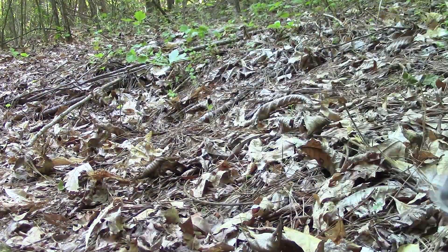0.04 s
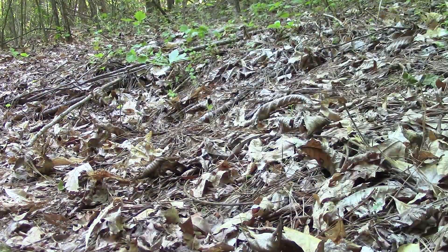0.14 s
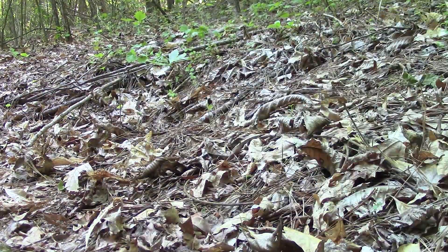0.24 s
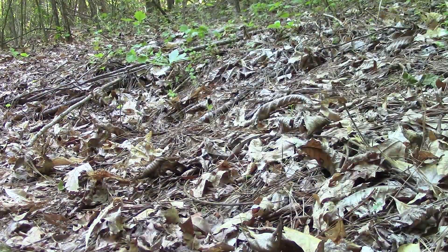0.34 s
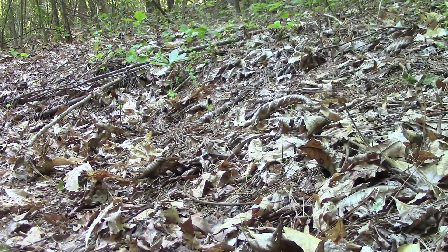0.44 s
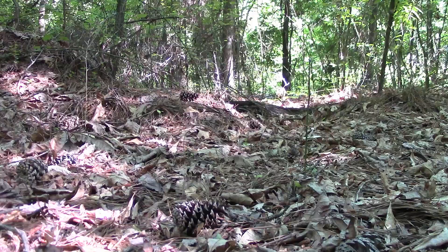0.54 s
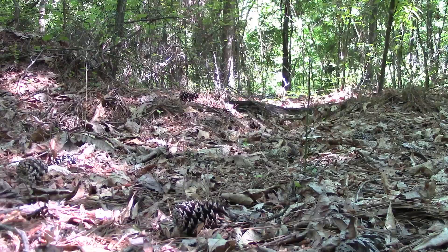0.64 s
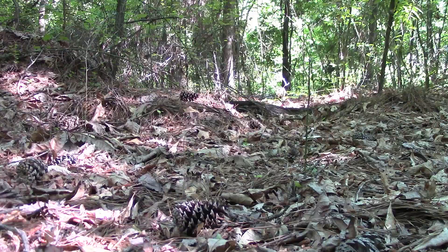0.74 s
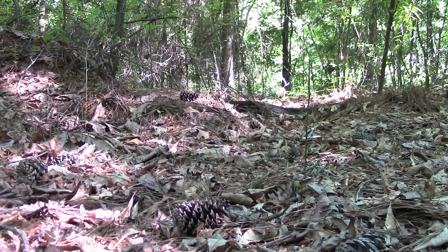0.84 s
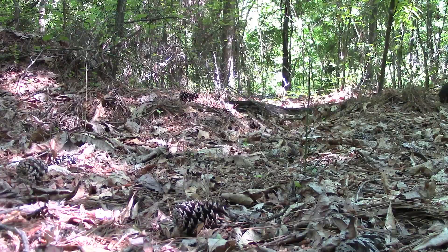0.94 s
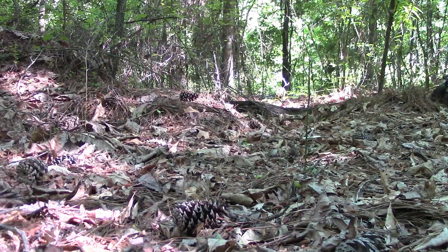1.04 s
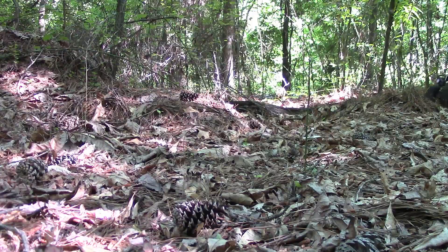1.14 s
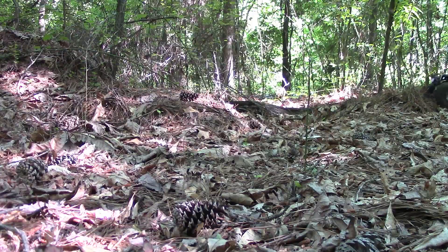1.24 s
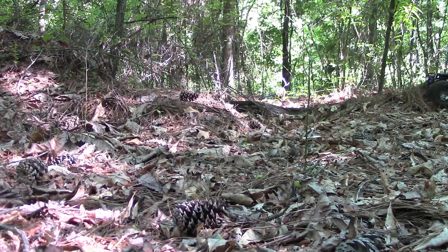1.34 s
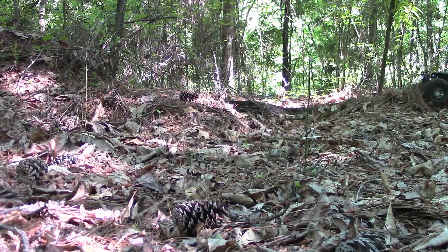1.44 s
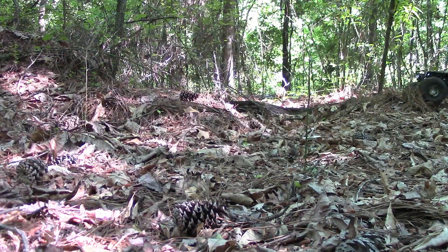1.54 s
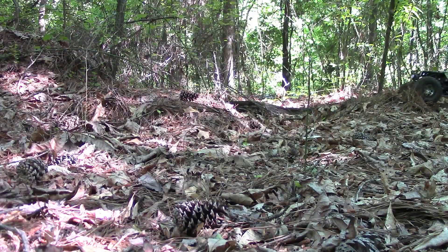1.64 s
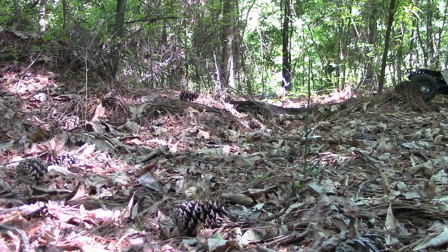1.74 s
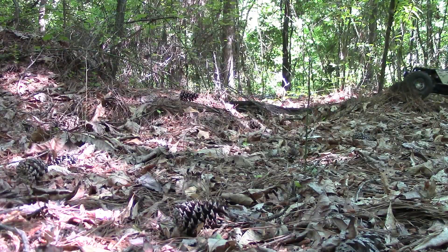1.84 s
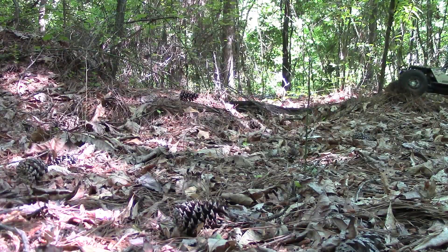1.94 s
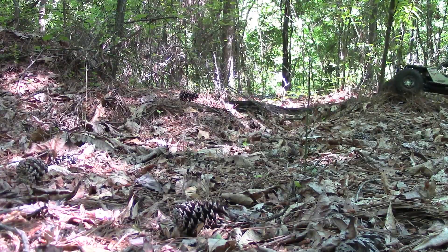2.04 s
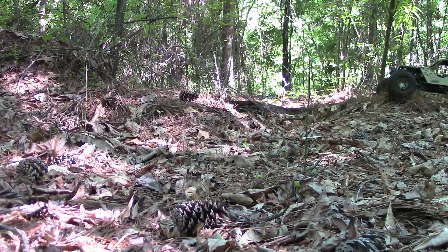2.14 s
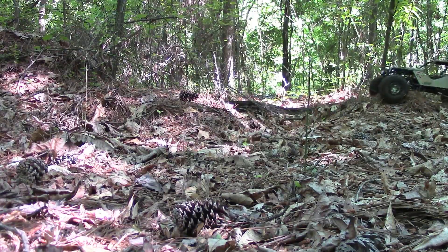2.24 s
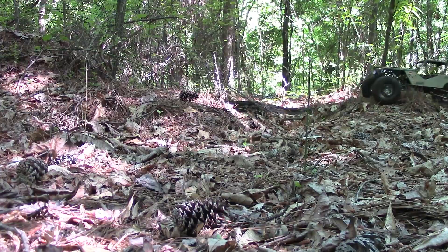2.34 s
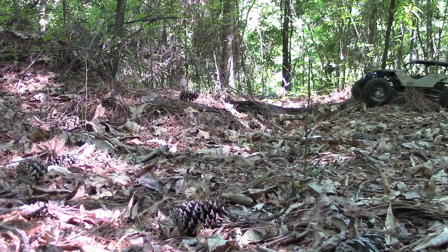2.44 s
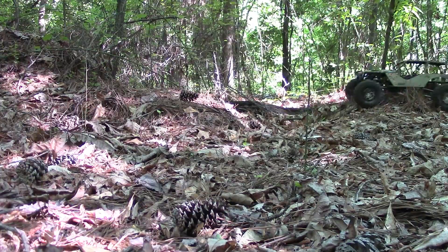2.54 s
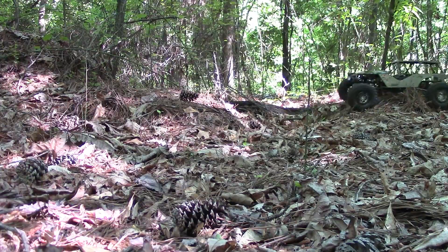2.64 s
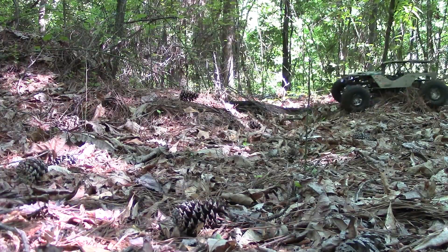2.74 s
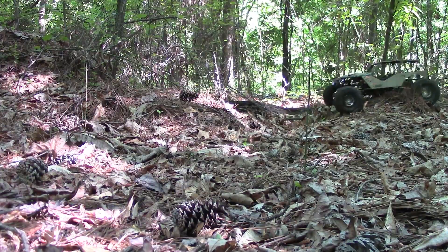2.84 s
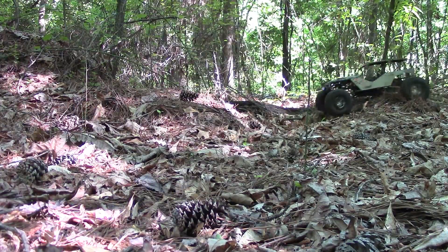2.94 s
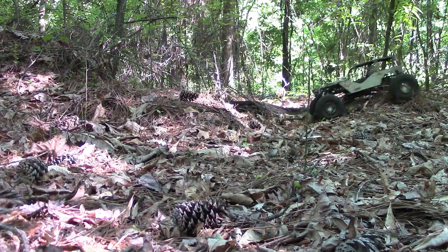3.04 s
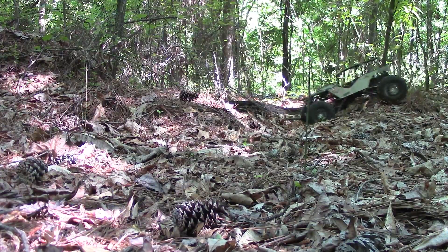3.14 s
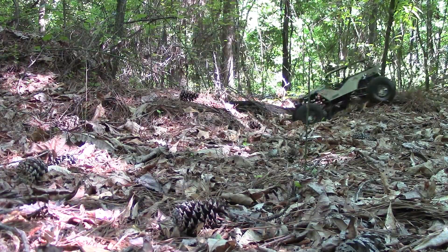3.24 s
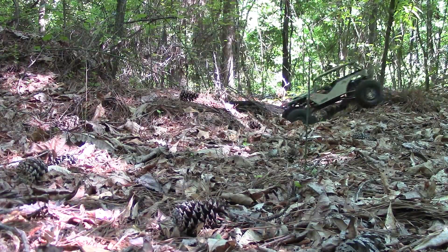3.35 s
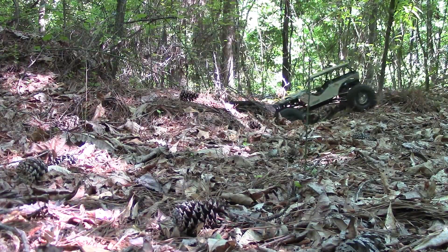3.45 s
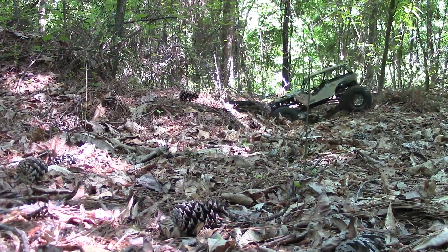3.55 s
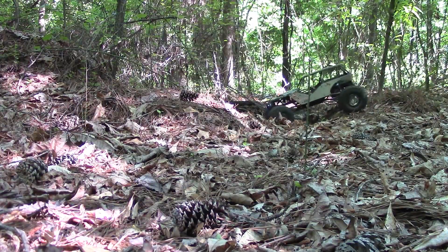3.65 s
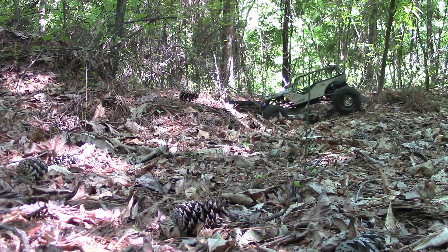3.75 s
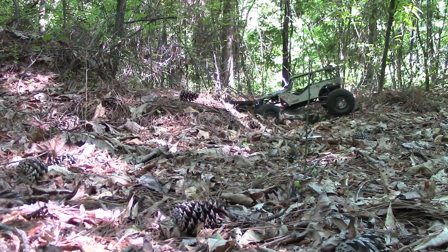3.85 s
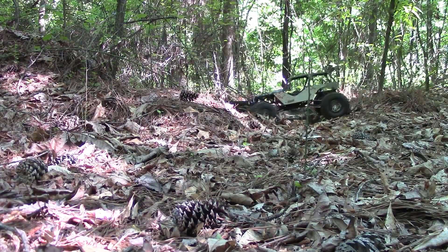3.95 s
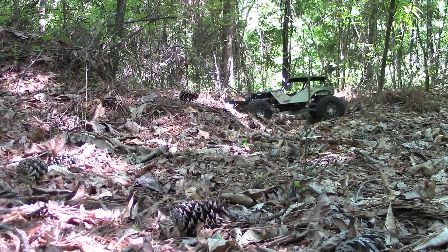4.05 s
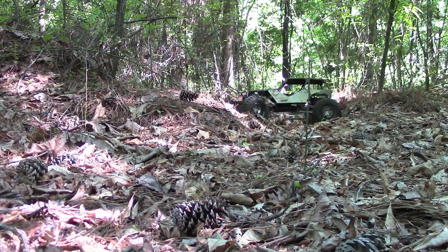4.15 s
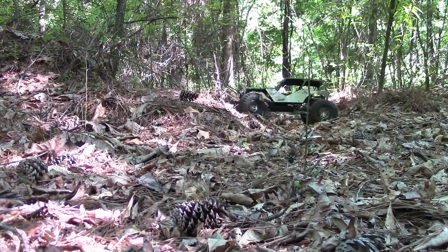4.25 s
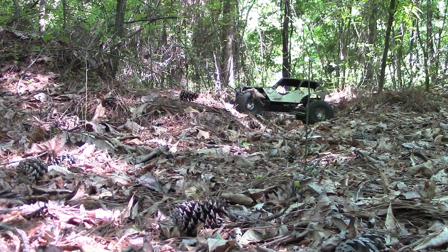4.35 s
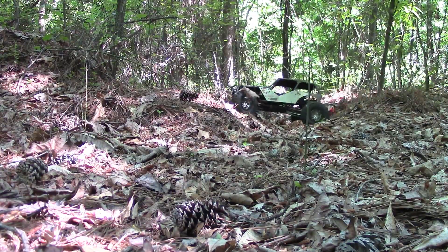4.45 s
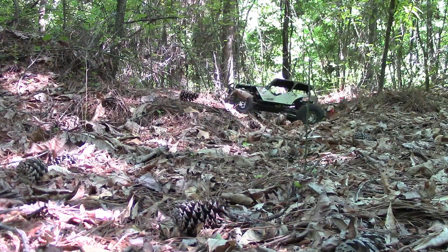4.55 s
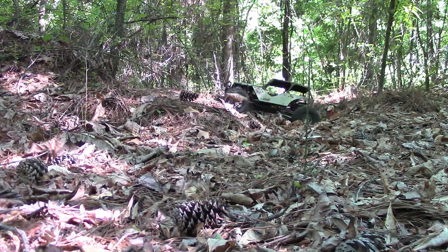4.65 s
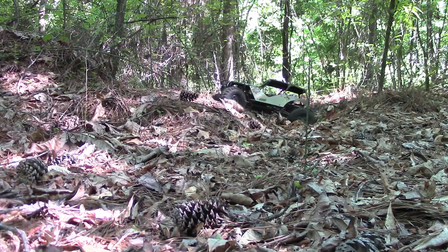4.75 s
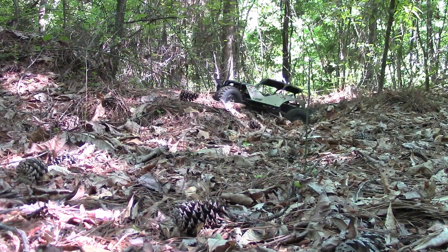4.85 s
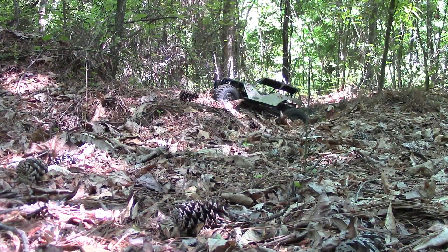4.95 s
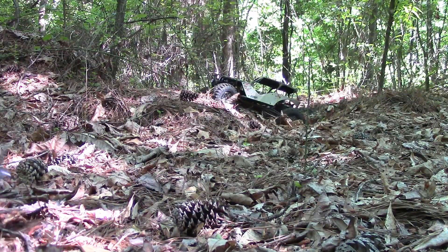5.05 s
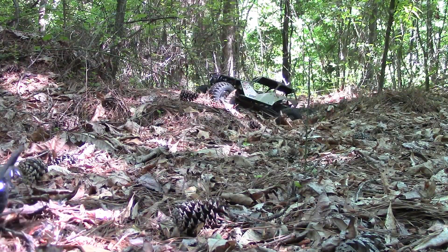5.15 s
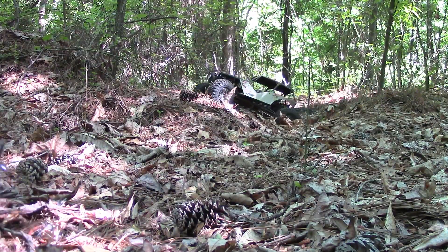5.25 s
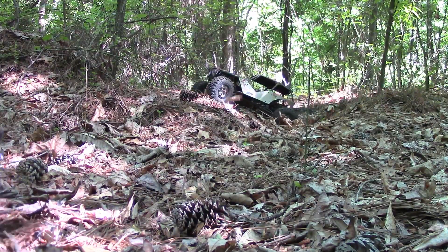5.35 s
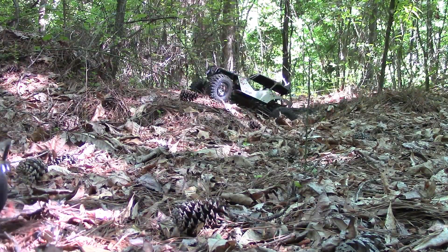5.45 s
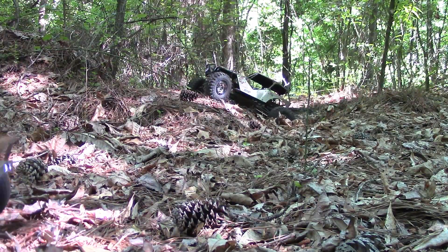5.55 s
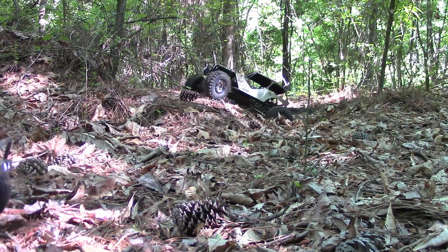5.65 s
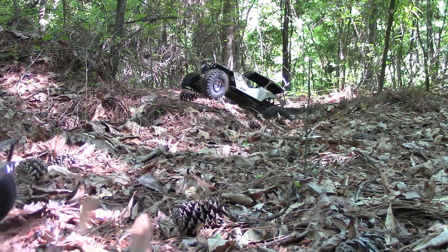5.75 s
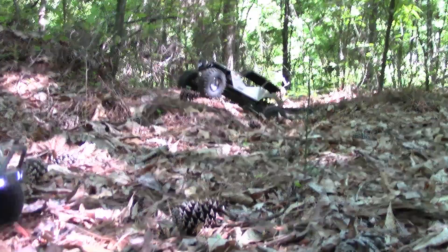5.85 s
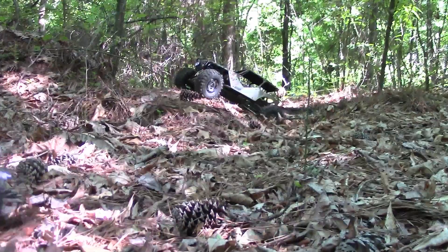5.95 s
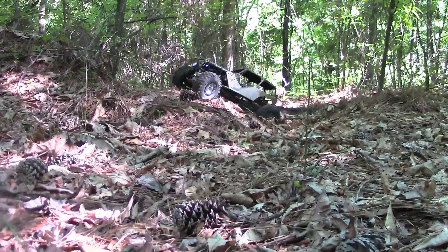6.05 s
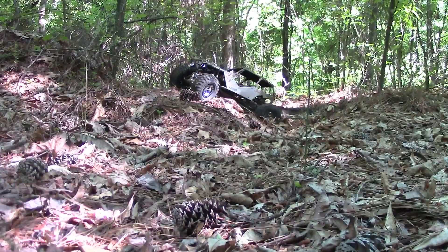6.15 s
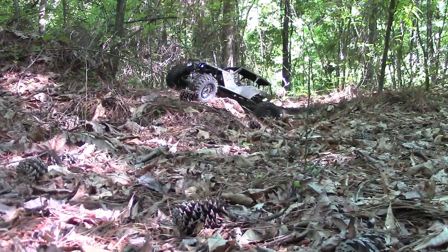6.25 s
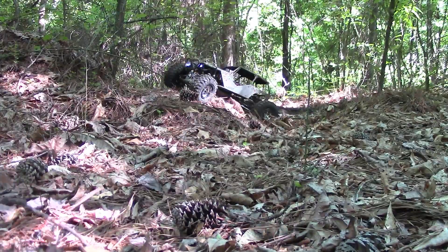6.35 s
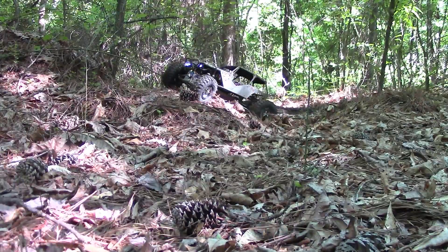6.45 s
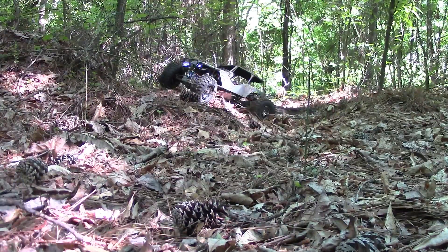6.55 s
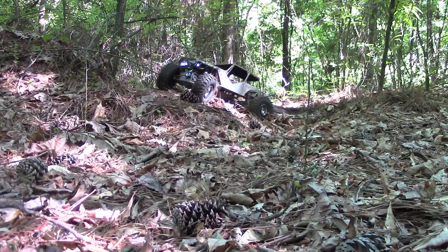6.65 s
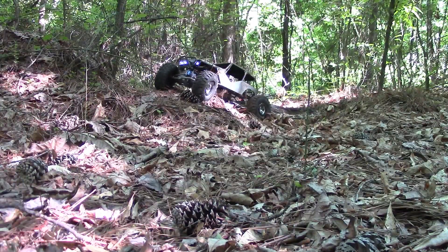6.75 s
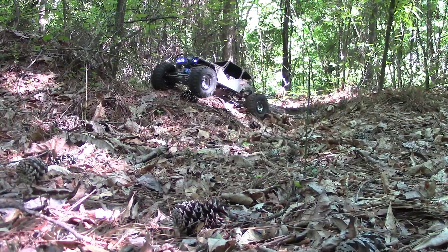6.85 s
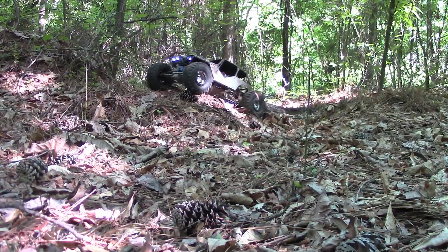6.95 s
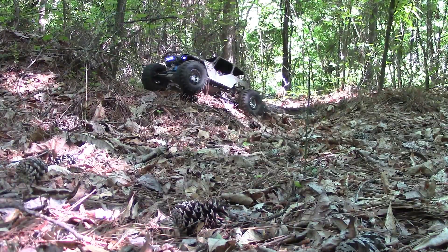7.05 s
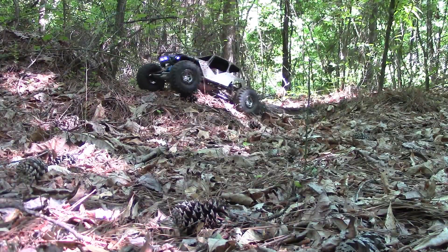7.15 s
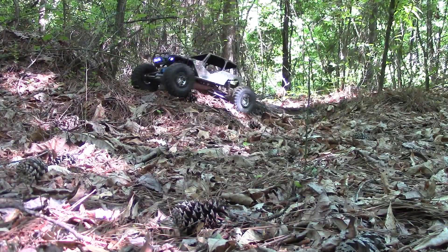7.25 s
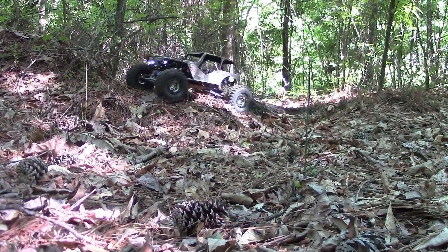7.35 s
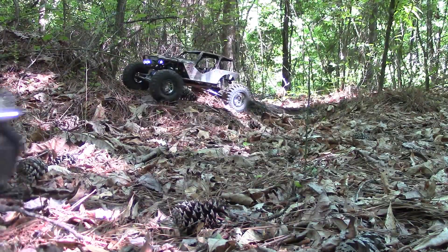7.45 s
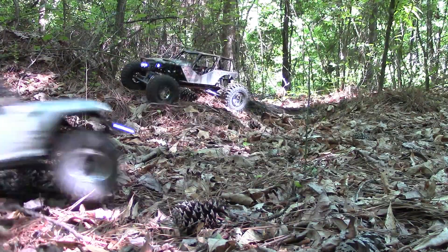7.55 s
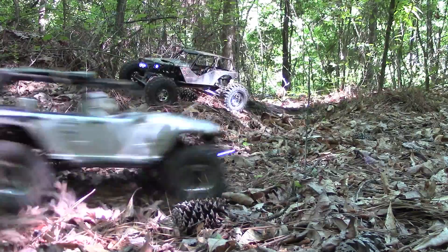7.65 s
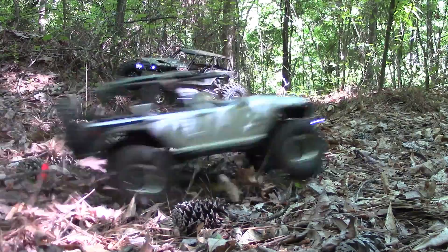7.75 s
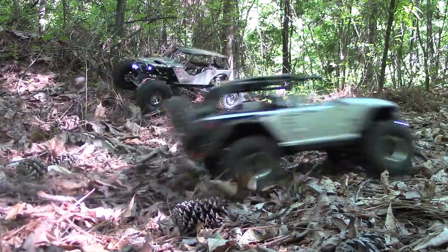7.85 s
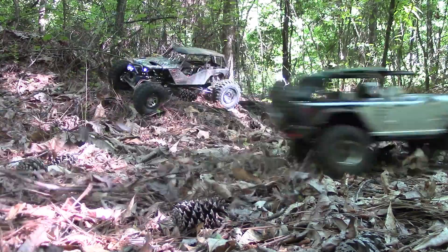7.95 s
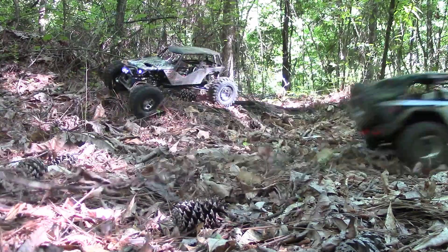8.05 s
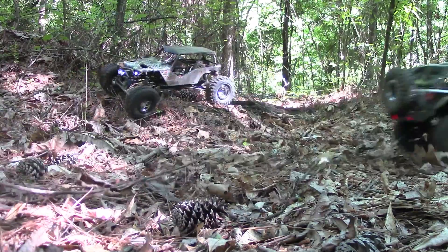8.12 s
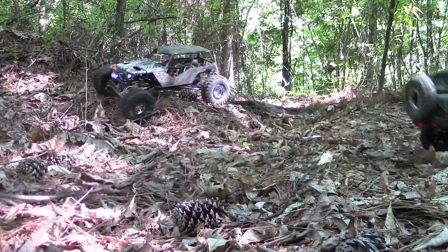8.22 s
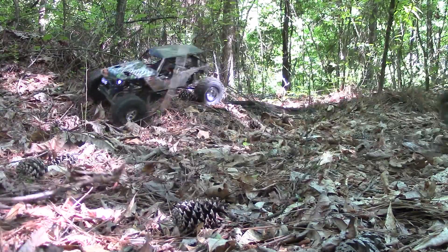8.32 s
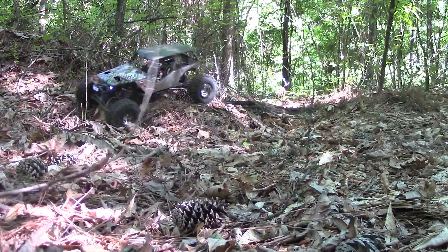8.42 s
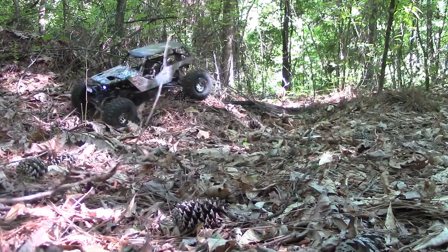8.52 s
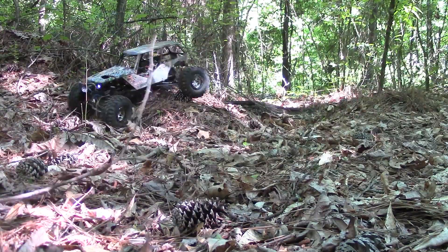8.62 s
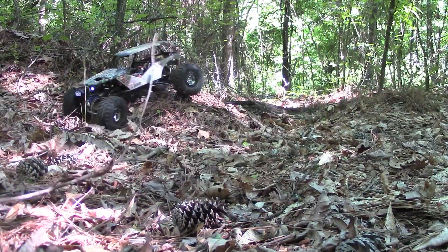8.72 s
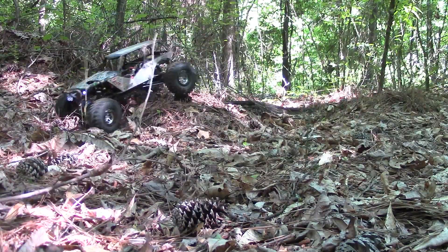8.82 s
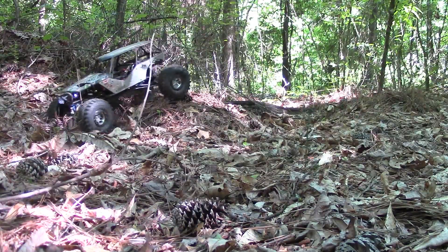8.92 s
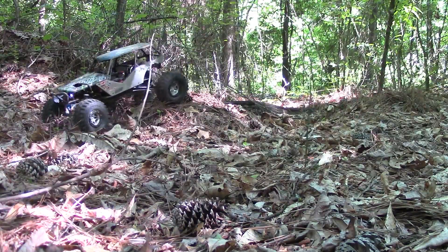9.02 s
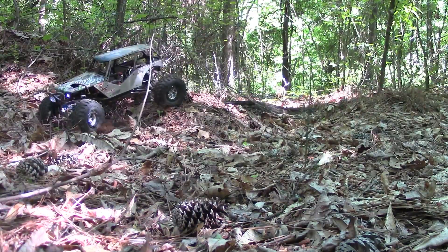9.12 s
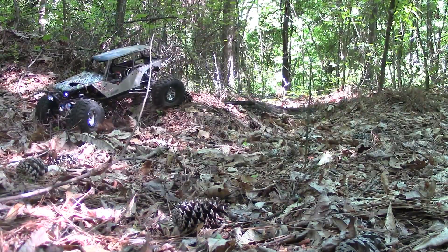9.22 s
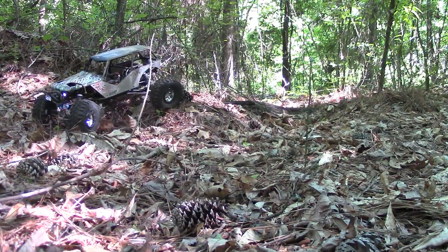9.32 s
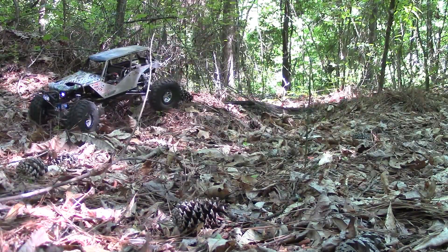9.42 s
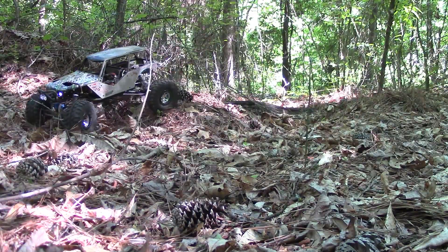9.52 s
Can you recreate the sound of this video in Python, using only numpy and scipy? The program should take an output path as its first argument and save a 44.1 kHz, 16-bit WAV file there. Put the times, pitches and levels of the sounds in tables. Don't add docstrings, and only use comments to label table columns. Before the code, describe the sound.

Close crackling leaves, snapping twigs and a small motor hum open, then the scene shifts abruptly to quieter slow rolling. A small electric truck crunches through dry litter in surges, its gears whining upward, axles thumping on roots. A second truck rushes past close and loud, then its motor runs down among thinning crackles. Outdoors in woods, faint steady air, microphone near the ground in close stereo.

```python
import sys
import numpy as np
from scipy import signal
from scipy.fft import rfft, irfft, next_fast_len
from scipy.io import wavfile
from scipy.ndimage import uniform_filter1d, map_coordinates

SR = 44100
rng = np.random.default_rng(int(sys.argv[2]) if len(sys.argv) > 2 else 0)


def how_loud(loudness_db):
    steps = np.asarray(loudness_db, float) / 20
    return 10 ** steps


def int16_out(signal):
    q = np.round(np.clip(np.atleast_2d(signal).T, -1, 1) * 32767)
    wavfile.write(sys.argv[1], SR, q.astype(np.int16))


N = 422478


def unit(x):
    return x / np.sqrt(np.mean(x ** 2) + 1e-20)


def along(points, hz):
    f, v = np.transpose(points)
    return np.interp(np.log(hz + 1), np.log(f + 1), v)


def curves(rows):
    s, *cols = np.transpose(rows)
    return [np.interp(np.arange(N) / SR, s, c) for c in cols]


def wobble(rate):
    knots = rng.standard_normal(int(N * rate / SR) + 4)
    return map_coordinates(knots, [np.arange(N) * rate / SR])


def filtered(x, response):
    m = next_fast_len(N + 8192)
    return irfft(rfft(x, m) * response(np.fft.rfftfreq(m, 1 / SR)), m)[..., :N]


def below(hz, edge_hz, order=6):
    return 1 / (1 + (hz / edge_hz) ** order)


def first_view():
    return np.arange(N) / SR < 0.588


def surges(rows, sharp=1):
    bite_db_per_s, let_go_db_per_s = 171 * sharp, 241 * sharp
    t = np.arange(0, N / SR + .002, .002)
    shapes = []
    for full_s, until_s, full_db, end_db, _ in rows:
        times = [full_s - 60 / bite_db_per_s, full_s, until_s, until_s + 60 / let_go_db_per_s]
        shapes.append(np.interp(t, times, [full_db - 60, full_db, end_db, end_db - 60]))
    shapes = np.array(shapes)
    loads = np.array(rows)[:, -1:]
    crush_db = shapes.max(axis=0)
    chassis_db = (shapes + loads).max(axis=0)
    return curves(np.transpose([t, crush_db, chassis_db - crush_db]))


# time_s, crushing_db
BESIDE_TRUCK = [(0, -24), (.04, -22.5), (.16, -23), (.3, -25), (.53, -24.5), (.585, -26.5)]
# time_s, crushing_db, chassis_load_db
SLOW_CRAWL = [(.59, -34.5, -6), (.87, -44, 0.5), (1.25, -34.5, -4), (1.72, -38, -5), (2.02, -33, -8),
              (2.52, -33.5, -4), (2.92, -34, -3), (3.38, -29.5, -5.5), (3.77, -38, -3), (4.2, -32.5, -9.5),
              (4.37, -39, -11), (5.15, -31.5, -10), (5.26, -34, -20), (5.92, -28.5, -5), (6.6, -32.5, -7.5),
              (6.7, -34, -6), (8.1, -29, -11.5), (9.58, -38, -17)]
# full_s, until_s, crushing_db,
# end_db, chassis_load_db
DULL_SURGES = [(2.97, 3.3, -25.5, -30, -8.5), (3.44, 3.71, -31.5, -25, -1.5),
               (3.86, 4.11, -24.5, -23, -5.5), (4.5, 4.66, -31.5, -26.5, -2.5), (4.68, 4.92, -29, -19, -4),
               (4.92, 5.04, -18.5, -20, -4.5), (5.04, 5.13, -20, -26.5, -8.5),
               (5.34, 5.52, -21.5, -18.5, -8.5), (5.52, 5.75, -16.5, -20.5, -5.5),
               (6.15, 6.6, -17, -29, -8.5), (6.75, 7.02, -37.5, -24.5, -3),
               (7.02, 7.2, -28.5, -26.5, -2.5), (7.28, 7.4, -18.5, -21.5, -7), (7.4, 7.72, -20.5, -18, -8)]
# full_s, until_s, crushing_db, end_db, chassis_load_db
RUSH_SURGES = [
    (5.75, 5.84, -23.5, -17.5, -2.5),
    (6.01, 6.13, -20.5, -24.5, -7),
    (7.4, 7.75, -39, -14, -12),
    (7.75, 8.08, -13.5, -22.5, -9),
    (8.12, 8.26, -21.5, -43, -8.5),
    (8.33, 8.65, -26.5, -26, -6),
    (8.65, 9.0, -28, -31, -6),
    (9.0, 9.28, -31, -31, -8.5),
    (9.28, 9.48, -28.5, -43.5, -10),
    (9.48, 9.58, -49, -39, -12),
]
# full_s, until_s, crushing_db, end_db, chassis_load_db
HEAP_BREAKS = [(3.455, 3.475, -35, -37, -13), (3.812, 3.85, -34, -31, -7), (4.73, 4.75, -39, -21, -7),
               (5.48, 5.5, -20.5, -19.5, -2), (5.545, 5.56, -19, -21, -8),
               (5.822, 5.885, -18.5, -15.5, -7.5), (5.897, 5.906, -15.5, -20.5, -4),
               (5.968, 5.992, -20, -17, -5), (6.15, 6.19, -34, -23, -11), (7.255, 7.28, -21, -26, -14),
               (7.595, 7.605, -23, -17, -15), (7.71, 7.725, -12, -20, -13), (7.772, 7.782, -17, -15, -6),
               (7.89, 7.9, -16, -21, -14), (7.94, 7.95, -24, -18, -9), (7.972, 7.98, -19, -17, -15),
               (8.098, 8.11, -21, -21, -15)]
# coarse_db, fine_db, dust_db
LITTER_GRADES = [
    (-2.5, -10.5, -13),
    (-4, -10, -7),
    (-7, -13.5, -12.5),
    (-11.5, -4, -34),
    (-13, -11.5, -10),
]
# coarse_db_per_db, fine_db_per_db, dust_db_per_db
GRADE_GROWTH = [
    (-.4, 0.074, .5),
    (0.24, 0.034, 0.52),
    (-0.47, 0.63, -0.44),
    (-0.076, 0, 0.093),
    (-0.14, 0.37, .05),
]


def effort():
    usual_load_db, load_slopes = -6.5, (0.63, -0.41, 0.36)
    beside = np.where(first_view(), curves(BESIDE_TRUCK)[0], -120)
    crawl, load = curves(SLOW_CRAWL)
    crawl = np.where(first_view(), -120, crawl)
    heaps = surges(HEAP_BREAKS, sharp=3.9)
    trucks = [(beside, usual_load_db), (crawl, load), surges(DULL_SURGES), surges(RUSH_SURGES), heaps]
    step = 32
    power = np.zeros((5, len(beside[::step])))
    for (crush_db, load_db), grades, grows in zip(trucks, LITTER_GRADES, GRADE_GROWTH):
        crush_db = crush_db[::step]
        load_db = (load_db + np.zeros(N))[::step]
        over_db = np.clip(crush_db + 25, -20, 20)
        graded = []
        for db, per_crush, per_load in zip(grades, grows, load_slopes):
            graded.append(crush_db + db + per_crush * over_db + per_load * (load_db - usual_load_db))
        power += how_loud(2 * np.array([crush_db, *graded, crush_db + load_db]))
    power[2] += how_loud(2 * -46)
    power[4] *= how_loud(2 * -7 * first_view()[::step])
    return curves(np.transpose([np.arange(0, N, step) / SR, *np.sqrt(power)]))


def patchy(depth_db):
    z = signal.stft(rng.standard_normal(N + 512), nperseg=256)[2]
    field = uniform_filter1d(rng.standard_normal(z.shape), size=9, axis=0)
    field = uniform_filter1d(field, size=6, axis=1)
    return unit(signal.istft(z * how_loud(depth_db * unit(field)), nperseg=256)[1][:N])


def grains(s, size, hz, cycles):
    k = np.arange(56)
    turns = np.clip(hz, 300, .4 * SR)[:, None] * k / SR
    rows = size[:, None] * np.sin(2 * np.pi * turns) * turns * np.exp(-turns / cycles)
    places = np.round(s * SR).astype(int)[:, None] + k
    return np.bincount(places.ravel(), rows.ravel(), N + SR)[:N]


def crackle(centre_hz, spread, scatter_db, cycles, count):
    u = rng.random((count, 2))
    hz = centre_hz * np.exp(spread * rng.standard_normal(count))
    size = how_loud(-scatter_db * np.log(u[:, 1] + .008)) * np.sqrt(hz / centre_hz)
    return unit(grains(u[:, 0] * (N - 1) / SR, size, hz, cycles))


# pitch_hz, level_db (per Hz)
LEAF_COLOUR = [(470, -57), (800, -6.5), (965, -1.5), (1140, -2.5), (1520, 2.5), (1900, 1), (3140, 2.5),
               (4340, 1.5), (5180, 1.5), (6500, 2), (8880, 0), (10700, 0), (14700, -2), (16000, -3.5)]
# time_s, brightness_db
WHEEL_FACING = [(0, 1.5), (.6, 0), (1.0, 2), (2, 1), (3, 1), (4.1, 0.5), (4.4, 1.5), (4.7, 0), (5.2, 0),
                (5.6, -1.5), (5.85, 0), (6.1, -0.5), (6.8, 0.5), (7.3, -1.5), (7.8, -2), (8.3, 2),
                (8.8, -1), (9.58, -2)]
# time_s, band_db
GROUND_HOLLOW = [(0, 1), (1, 2.5), (2, -1.5), (3, 1.5), (4, 0.5), (5, 2.5), (5.5, -2), (5.7, -5),
                 (5.85, -1.5), (6.2, 1.5), (6.8, 1), (7.4, 1), (7.8, -6), (8.2, -1), (9.58, -3)]


def litter(crush, coarse_gain, fine_gain, dust_gain, lumps):
    brittle_db = -8.5 - 0.061 * (20 * np.log10(crush) + 25)
    brittle = how_loud(np.where(first_view(), -2, brittle_db))
    rustle = patchy(depth_db=1.0)
    rustle = rustle + brittle * crackle(centre_hz=10000, spread=0.53, scatter_db=3.0, cycles=0.58, count=20000)
    rustle = rustle + 0.19 * crackle(centre_hz=10000, spread=0.23, scatter_db=3.5, cycles=1.4, count=1200)
    rustle = rustle / np.sqrt(1 + brittle ** 2)

    def colour(hz):
        notch_db = 4 / (1 + ((hz - 5350) / 620) ** 4)
        return how_loud(along(LEAF_COLOUR, hz) - notch_db)

    whole = filtered(rustle * how_loud(lumps), colour)
    low, middle, high = [filtered(whole, lambda hz: below(hz, edge, order=12)) for edge in (2400, 8500, 12000)]
    coarse, body, fine, dust = low, middle - low, high - middle, whole - high
    bright = how_loud(curves(WHEEL_FACING)[0])
    leaves = crush * unit(body) + coarse_gain * unit(coarse)
    leaves = leaves + bright * (fine_gain * unit(fine) + dust_gain * unit(dust))
    band = filtered(leaves, lambda hz: below(hz, 6700) - below(hz, 4100))
    return leaves + (how_loud(curves(GROUND_HOLLOW)[0]) - 1) * band


# pitch_hz, level_db (per Hz)
CHASSIS_COLOUR = [(24, -68), (40, -87), (65, -26.5), (187, -4.5), (236, -5.5), (382, 1.5), (559, -0.5),
                  (726, -2), (840, -6), (1300, -9), (1690, -16), (2860, -120)]


def chassis(gain, lumps):
    shaking = patchy(depth_db=1.0) * how_loud(0.97 * lumps + 0.52 * wobble(30))
    return gain * unit(filtered(shaking, lambda hz: how_loud(along(CHASSIS_COLOUR, hz))))


def tyres():
    *litter_gains, chassis_gain = effort()
    lumps = 0.059 * wobble(27) + 0.69 * wobble(45) + 0.71 * wobble(160)
    return litter(*litter_gains, lumps) + chassis(chassis_gain, lumps)


def tone(rows, orders, blur, flutter_db):
    s, hz, *levels = np.transpose(rows)
    t = np.arange(round(s[0] * SR), min(round(s[-1] * SR), N)) / SR
    gate = np.clip(np.minimum(t - s[0], s[-1] - t) / 0.0041, 0, 1)

    def chance(rate):
        knots = rng.standard_normal(int(len(t) * rate / SR) + 4)
        return map_coordinates(knots, [(t - t[0]) * rate])

    phase = 2 * np.pi * np.cumsum(np.interp(t, s, hz)) / SR + blur * (chance(220) + 3 * chance(45))
    total = np.zeros(len(t))
    for i, (k, db) in enumerate(orders):
        level_db = np.interp(t, s, levels[min(i, len(levels) - 1)])
        total += how_loud(level_db + db + flutter_db * chance(56.6)) * np.sin(k * phase)
    out = np.zeros(N)
    out[round(s[0] * SR):][:len(t)] = np.sqrt(2) * gate * total
    return out


# time_s, pitch_hz, level_db
IDLE_PITCH = [
    (0.0, 597, -33),
    (0.098, 624.8, -42),
    (0.586, 666, -38),
    (0.602, 615, -38),
    (0.85, 607, -50),
]


def idle_motor():
    return tone(IDLE_PITCH, [(0.99, -1.5)], blur=0.5, flutter_db=2)


# pitch_hz, level_db (per Hz)
FOREST_COLOUR = [(15, -50), (25, -15), (200, 6.5), (416, 1.5), (591, 5), (2000, -11.5), (3820, -1),
                 (7110, -21), (9320, -28), (16000, -16)]


def forest():
    air = filtered(rng.standard_normal(N), lambda hz: how_loud(along(FOREST_COLOUR, hz)))
    return how_loud(-45) * unit(air)


def breeze():
    air = rng.standard_normal((2, N))
    shared, own = filtered(air, lambda hz: below(hz, 80) * (1 - below(hz, 38)))
    level_db = np.where(first_view(), -64, -89) + 5 * wobble(2)
    return how_loud(level_db) * np.array([unit(shared), .15 * unit(own)])


# pitch_hz, t60_s
TRUNK_DECAY = [(300, 0.11), (3000, 0.17), (12000, 0.11)]


def trunks(x):
    hz, t, z = signal.stft(rng.standard_normal((2, SR // 3)), SR, nperseg=256)
    decay = how_loud(-60 * t / along(TRUNK_DECAY, hz)[:, None])
    tail = signal.istft(z * decay, SR, nperseg=256)[1]
    return signal.fftconvolve(x[None], tail / np.linalg.norm(tail[0]), axes=1)[:, :N]


# start_s, peak_db, pitch_hz
SNAP_BREAKS = [(0.041, 4.5, 6600), (0.141, 2, 6780), (0.153, 8, 3600), (.176, 7.5, 4500),
               (0.2268, 4.5, 4930), (.216, 3, 3220), (0.4661, -1, 5450), (0.557, -3, 2750),
               (1.869, -1.5, 10000), (2.155, -3, 9000), (3.7837, -5, 5960), (3.8337, -5, 3390),
               (5.4799, 5, 3670), (5.9628, -1, 3270), (7.456, 0, 2000), (7.4615, 3, 1550), (7.543, 3, 1000),
               (7.767, 5, 1600), (7.601, 10.5, 2770), (8.092, 10, 6530), (8.102, 4, 3870),
               (8.404, 2.5, 4300), (8.5895, 6, 3600), (8.757, -0.5, 8650), (8.797, 4, 2920),
               (8.8005, -2, 3300), (8.9496, -3, 2900)]
# start_s, peak_db, pitch_hz
MORE_SNAP_BREAKS = [(.832, -17, 8970), (1.0246, -16, 5480), (1.3788, -6.5, 11300), (1.93, -15, 9300),
                     (1.997, -6, 5060), (2.393, -11, 7000), (2.461, -6, 3250), (2.5345, -9, 5930),
                     (2.6135, -9, 5580), (2.6524, -11, 8200), (2.692, -7, 5800), (2.9266, -9, 6540),
                     (3.8124, -7, 2800), (4.5795, -12, 3960), (6.564, -2, 8700), (8.834, -3, 2880),
                     (9.0653, -2.5, 8050), (9.1314, -5, 10000), (9.4898, -10, 3610), (9.521, -14, 5000),
                     (9.539, -7.5, 8450),
                     (1.346, -15, 9180), (1.5875, -15, 3220), (1.6808, -19, 7890), (1.8504, -15, 3490),
                    (1.8579, -15, 2300), (1.9557, -12, 8500), (2.0145, -8, 3210), (2.235, -13, 2000),
                    (2.683, -9, 3250), (2.7563, -9, 3250), (2.8235, -13, 6530), (3.4683, -6, 3010),
                    (4.3153, -16, 8460), (4.7338, -7, 3740), (4.7448, -3, 3190), (5.9813, -14, 8300),
                    (6.4704, 1, 7000), (6.5176, -12, 6620), (7.0918, -3, 6600), (7.1541, -9, 7830),
                    (7.413, -14, 2750), (8.615, -6, 5060), (.8782, -20, 9450), (1.0583, -16, 7730),
                    (1.3277, -19, 10700), (8.5, -8, 12000), (8.861, -10, 11000), (8.897, -7, 11500),
                    (8.9695, -10, 9100), (9.008, -12, 10000), (9.018, -14, 7500), (9.1, -11, 8500),
                    (9.155, -12, 8500), (7.569, 1, 3160), (7.9394, 3, 8270)]


def snaps():
    wood, leaf, t = np.zeros(N + SR), np.zeros(N + SR), np.arange(1800) / SR
    for s, db, hz in SNAP_BREAKS + MORE_SNAP_BREAKS:
        bulk = np.clip(how_loud(db + 6.0), 0, 1)
        grit = rng.standard_normal(len(t) + 2)
        shape = how_loud(db - 5.0 - 60 * t / (0.0074 + 0.0079 * bulk)) * (1 - np.exp(-t / 0.0004))
        rough = 1 + 0.64 * uniform_filter1d(grit[2:], size=12) * np.sqrt(12)
        ring = rough * np.sin(2 * np.pi * hz * t)
        here = slice(round(s * SR), round(s * SR) + len(t))
        wood[here] += shape * (0.5 * bulk * grit[2:] + 0.31 * ring)
        leaf[here] += shape * 0.93 * (1 - bulk) * (grit[2:] - grit[:-2])
    dull = filtered(wood[:N], lambda hz: below(hz, 15800))
    return filtered(dull + leaf[:N], lambda hz: below(hz, 15700) * (1 - below(hz, 900)))


def glide(s, length, from_hz, to_hz, db):
    ends_db = db - 4.5
    return [(s, from_hz, ends_db), (s + length / 2, (from_hz + to_hz) / 2, db), (s + length, to_hz, ends_db)]


# start_s, length_s, from_hz, to_hz, level_db
CREEP_WHINES = [
    (0.55, 0.041, 1300, 1384, -25),
    (1.09, 0.055, 2220, 2130, -41),
    (1.238, 0.032, 2200, 2000, -37),
    (1.6, 0.07, 3200, 2980, -45),
    (1.739, 0.1, 2680, 2610, -40),
    (1.825, .05, 2600, 2120, -42),
    (2.532, 0.092, 1843, 1685, -36),
    (2.723, 0.089, 1654, 1536, -29.5),
    (2.82, 0.096, 1910, 1880, -38),
]


def creeping():
    return sum(tone(glide(*row), [(1, 0), (2, -7)], blur=.6, flutter_db=2.8) for row in CREEP_WHINES)


# time_s, level_db
SWITCH_LEVELS = [(.595, -44), (.9, -56), (1.2, -55), (2.3, -48.5), (4.3, -56), (6, -60), (8.1, -40),
                 (8.4, -45), (9.58, -64)]


def switching():
    rows = [(s, 5938, db) for s, db in SWITCH_LEVELS]
    return tone(rows, [(1, 0)], blur=.15, flutter_db=3)


# time_s, pitch_hz, level_db, octave_db (if heard)
WAVERING_MESH = [
    [(2.1, 2010, -30, -55), (2.135, 1880, -38, -55), (2.18, 2090, -32, -50), (2.21, 2110, -36, -48),
     (2.24, 1990, -35, -48), (2.33, 1980, -39, -50), (2.37, 1960, -42, -52), (2.42, 2010, -33, -55)],
    [(3.185, 2000, -32, -45), (3.215, 1850, -35, -35), (3.245, 1830, -35, -39), (3.27, 1570, -26, -31),
     (3.305, 1480, -26.5, -36), (3.345, 1480, -18, -37), (3.37, 1600, -35, -36), (3.42, 1950, -36, -46)],
    [(4.685, 3080, -35), (4.712, 3270, -29), (4.74, 3210, -34), (4.765, 3200, -35)],
    [(7.175, 3240, -33), (7.2, 3250, -31), (7.25, 3370, -28)],
    [(8.285, 3420, -29), (8.3, 3400, -25), (8.32, 3120, -30), (8.345, 2830, -30)],
]


def wavering():
    total = 0
    for rows in WAVERING_MESH:
        orders = [(1, 0), (2, 0)][:len(rows[0]) - 2]
        total = total + tone(rows, orders, blur=.45, flutter_db=2.4)
    return total


# start_s, peak_db, pitch_hz
ROOT_BUMPS = [
    (2.563, -23, 150),
    (2.8, -32, 288),
    (4.649, -11.5, 218),
    (5.028, -8, 352),
    (5.86, -5, 390),
    (7.3, -14, 737),
    (7.345, -11, 700),
    (7.533, -10, 680),
    (8.948, -33, 320),
]


def bumps():
    low, t = np.zeros(N + SR), np.arange(1800) / SR
    for s, db, hz in ROOT_BUMPS:
        swing = how_loud(db - 4 - 60 * t / 0.089) * np.sin(2 * np.pi * hz * t)
        low[round(s * SR):][:len(t)] += swing * (1 - np.exp(-t / 0.0082))
    return low[:N]


# time_s, pitch_hz, level_db, octave_db
SPIN_UP_PULLS = [
    [(3.482, 3020, -30, -50), (3.51, 3200, -25, -50), (3.53, 3810, -30, -50), (3.56, 4180, -32, -50),
     (3.6, 4350, -33, -50), (3.65, 4480, -36, -55), (3.69, 4350, -35, -50)],
    [(4.4, 652, -48, -44), (4.43, 1050, -37, -46), (4.455, 1710, -30, -36), (4.478, 2350, -36, -41),
     (4.5, 3100, -27, -50), (4.525, 3700, -33, -50), (4.555, 4080, -39, -50), (4.573, 4200, -31, -50),
     (4.582, 4000, -25, -50), (4.592, 3930, -28, -50)],
    [(5.295, 1043, -36, -36), (5.32, 1286, -28, -39), (5.345, 1535, -32, -40), (5.365, 1786, -32, -32),
     (5.39, 2290, -26, -36), (5.41, 2800, -32, -45), (5.43, 3500, -36, -45)],
    [(6.693, 884, -41, -48), (6.72, 1400, -29, -46), (6.75, 1950, -38, -38), (6.775, 2620, -35, -50),
     (6.81, 3100, -36, -52), (6.84, 3650, -39, -52), (6.872, 4100, -36, -50)],
]


def spinning_up():
    return sum(tone(rows, [(1, 0), (2, 0)], blur=.8, flutter_db=2.2) for rows in SPIN_UP_PULLS)


# time_s, pitch_hz, level_db, second_multiple_db
LABOURING = [
    (3.54, 183.3, -37, -35),
    (3.69, 218, -30, -33),
    (3.75, 173, -45, -52),
]


def labouring_shaft():
    return tone(LABOURING, [(1, 0.1), (2, 0.1)], blur=0.1, flutter_db=1.5)


# start_s, length_s, from_hz, to_hz, level_db
SHORT_WHINES = [(4.595, 0.022, 3990, 4000, -26), (4.375, .05, 1340, 1420, -42),
                (6.125, .04, 2600, 3000, -27), (6.175, .05, 3250, 3170, -29), (7.318, .025, 4150, 4080, -23),
                (7.33, .025, 3650, 3520, -26), (7.58, 0.1, 2080, 2030, -25), (7.59, 0.065, 690, 720, -26.5),
                (7.7, 0.047, 690, 460, -22.5), (7.64, .055, 440, 420, -26.5), (7.765, .06, 310, 400, -26),
                (7.465, 0.056, 300, 380, -27), (8.262, .025, 3200, 3520, -34), (8.37, .025, 2900, 3450, -30),
                (7.885, 0.027, 2600, 3900, -28), (3.825, 0.0424, 3200, 3800, -28)]


def whining():
    return sum(tone(glide(*row), [(1, 0), (2, -14)], blur=.4, flutter_db=2) for row in SHORT_WHINES)


# time_s, pitch_hz, level_db
HELD_SPEED = [
    [(5.445, 4140, -33), (5.5, 4300, -28), (5.56, 4260, -27), (5.6, 4550, -36), (5.64, 4560, -33),
     (5.68, 4650, -33), (5.72, 4530, -28), (5.77, 4580, -26), (5.84, 4120, -24)],
    [(7.455, 3220, -29), (7.5, 3210, -24), (7.54, 3200, -30), (7.57, 3055, -25), (7.61, 3160, -27),
     (7.65, 3180, -25), (7.69, 2780, -23), (7.73, 2840, -29), (7.76, 3000, -30)],
    [(6.01, 3300, -30), (6.045, 3650, -25), (6.075, 3900, -29), (6.11, 3960, -38), (6.16, 3950, -26),
     (6.19, 4120, -28), (6.21, 4080, -32), (6.23, 4080, -26), (6.27, 4050, -28)],
]


def holding():
    return sum(tone(rows, [(1, 0)], blur=1.1, flutter_db=2.5) for rows in HELD_SPEED)


# time_s, pitch_hz, level_db, overtones_db
RUN_DOWN = [(8.33, 1215, -44, -38), (8.396, 1195, -43, -37), (8.46, 1139, -35, -36),
            (8.544, 1070, -28.5, -34), (8.6, 970, -27.5, -40), (8.66, 859, -27, -38),
            (8.724, 782, -32, -41), (8.8, 746, -36, -44), (8.912, 713, -36, -47), (8.96, 737, -42, -54)]
# multiple, level_db
RUN_DOWN_ORDERS = [(1, 0), (2, -1), (3, -2), (4, 2), (5, 0), (6, -1)]


def coasting():
    poles = tone(RUN_DOWN, RUN_DOWN_ORDERS, blur=0.06, flutter_db=2.2)
    return filtered(poles, lambda hz: below(hz, 5300))


def motors():
    slow = idle_motor() + creeping() + switching() + wavering()
    return slow + spinning_up() + labouring_shaft() + whining() + holding() + coasting()


# time_s, left_right_db
TRUCK_BEARING = [(0, -3), (.585, -2.5), (.59, -0.5), (2.2, 2), (2.5, 6), (4.07, 6.5), (4.33, 0),
                 (4.55, 7.5), (5.1, 3), (5.9, 1.5), (6.85, 6.5), (7.07, 5), (8.1, -2), (8.3, 0.5),
                 (9.58, 0)]
# pitch_hz, share
PORT_AIM = [(1200, 0.01), (2400, 0.17), (4400, 0.58), (8100, 1.23), (15000, 0.29)]
# pitch_hz, share
PHASE_LOSS = [(1200, 0.015), (3100, 0.042), (6800, 1), (15000, 1)]
# pitch_hz, level_db
UNSHARED = [(40, -43), (200, -31.5), (700, -34), (1400, -36), (2500, -26.5), (5000, -43.5), (15000, -20)]


def scene():
    near = tyres() + snaps() + bumps() + motors()
    far, echo, air = forest(), trunks(near), breeze()
    lean = np.tanh(curves(TRUCK_BEARING)[0] * np.log(10) / 40)
    mid = near + far + how_loud(-20) * echo[0] + air[0]
    drift = np.exp(1j * np.cumsum(0.038 * wobble(29)))
    spread = np.real(signal.hilbert(near, next_fast_len(N))[:N] * drift)
    aimed = filtered(lean * near, lambda hz: along(PORT_AIM, hz))
    aimed = aimed + filtered(lean * spread, lambda hz: along(PHASE_LOSS, hz))
    unlike = spread + 0.094 * echo[1] + 11.0 * far[::-1]
    side = aimed + air[1] + filtered(unlike, lambda hz: how_loud(along(UNSHARED, hz)))
    return np.array([mid + side, mid - side])


def low_pass(x):
    return signal.sosfilt(signal.butter(12, 16180, fs=SR, output="sos"), x)


def record(dry):
    held = dry / (1 + np.abs(dry / .85) ** 6) ** (1 / 6)
    kept = filtered(held, lambda hz: (1 - below(hz, 33)) * (hz < 15880))
    return low_pass(kept)


dry = scene()
out = record(dry)
int16_out(out)
```